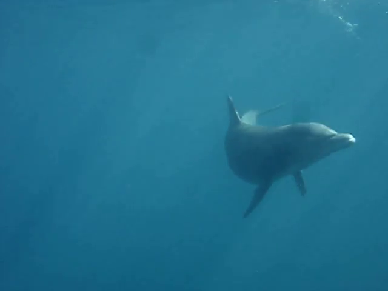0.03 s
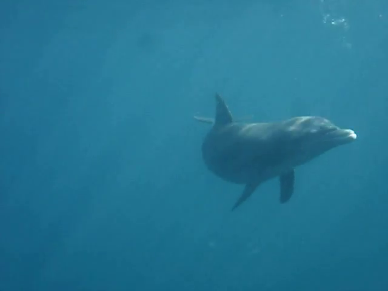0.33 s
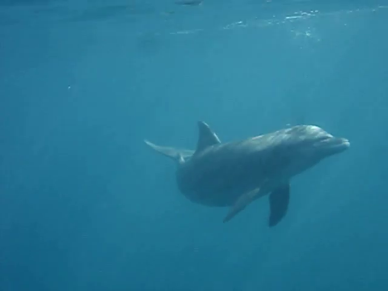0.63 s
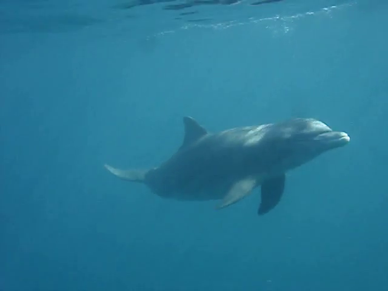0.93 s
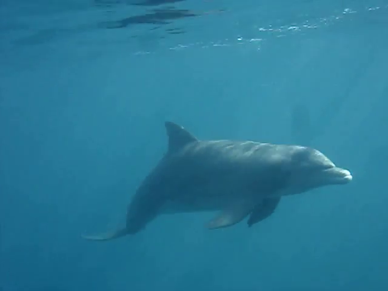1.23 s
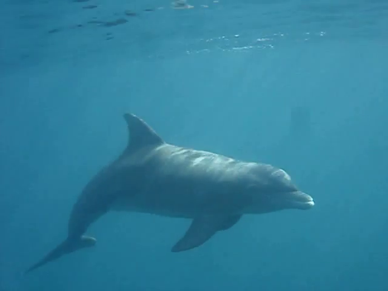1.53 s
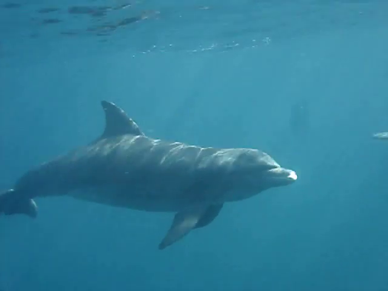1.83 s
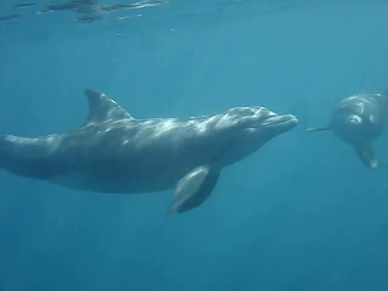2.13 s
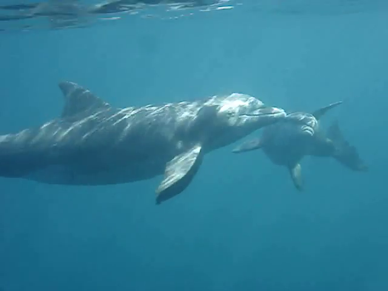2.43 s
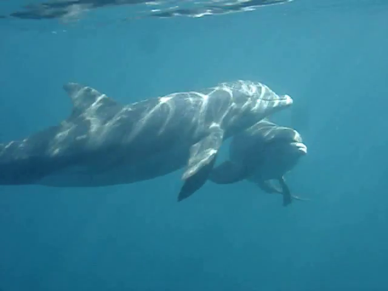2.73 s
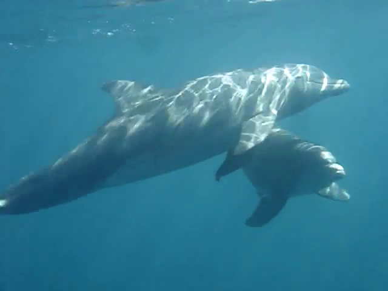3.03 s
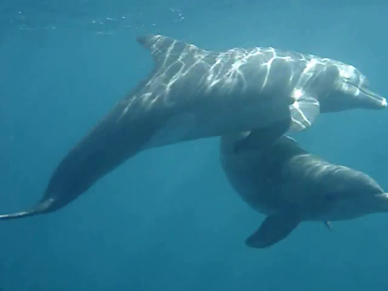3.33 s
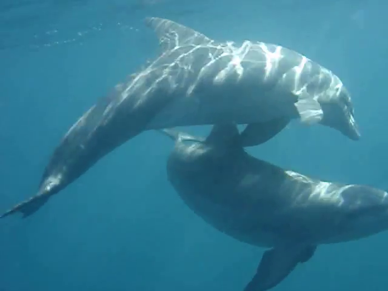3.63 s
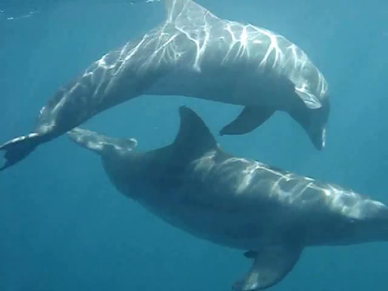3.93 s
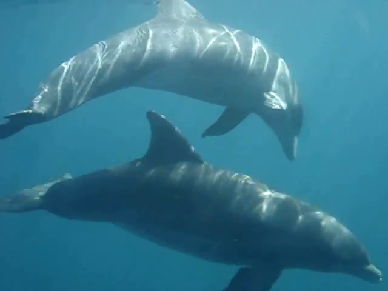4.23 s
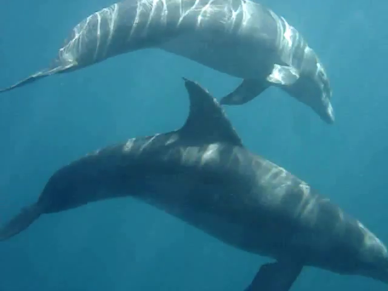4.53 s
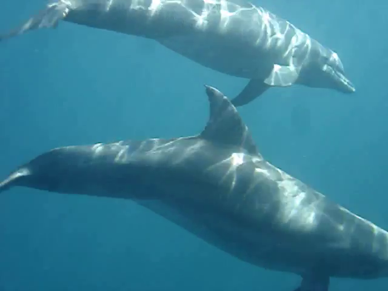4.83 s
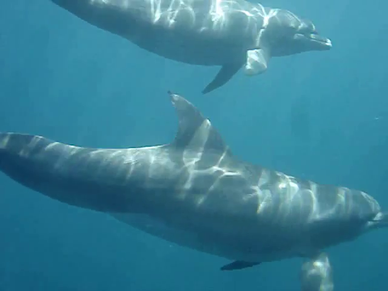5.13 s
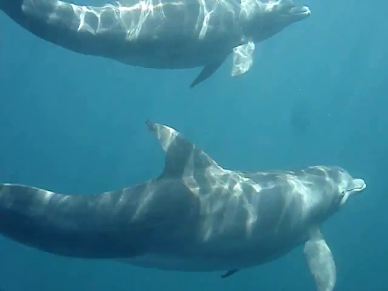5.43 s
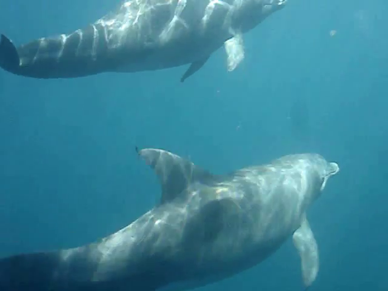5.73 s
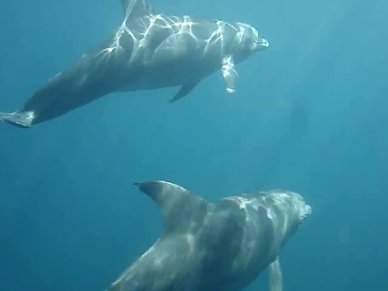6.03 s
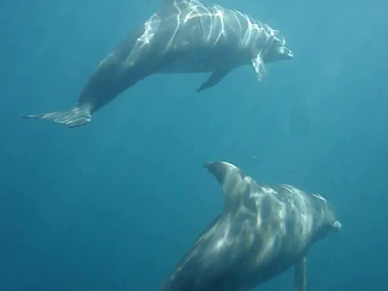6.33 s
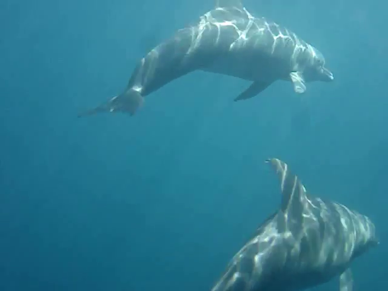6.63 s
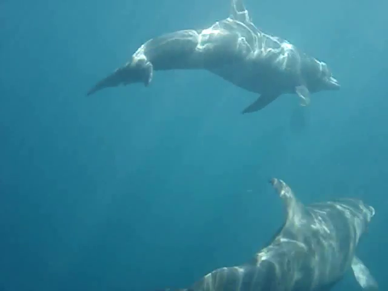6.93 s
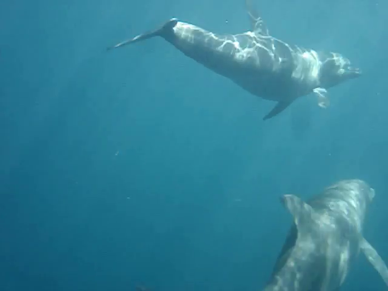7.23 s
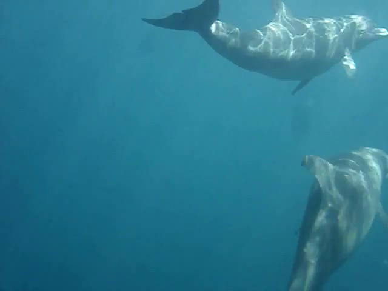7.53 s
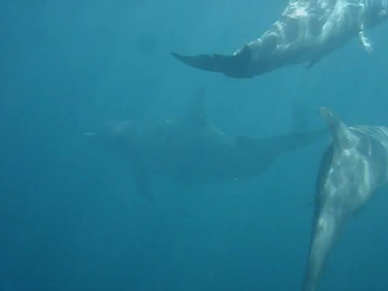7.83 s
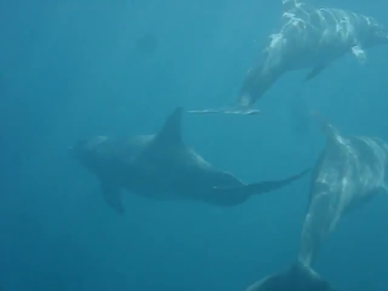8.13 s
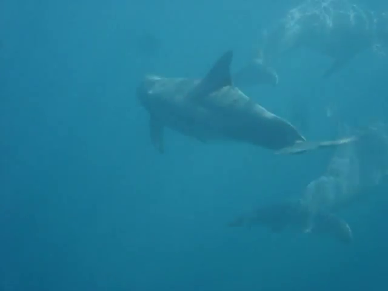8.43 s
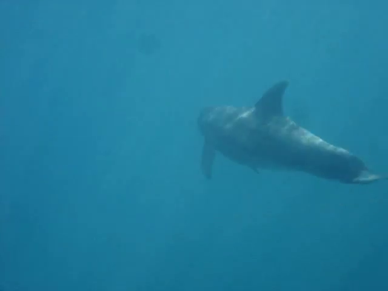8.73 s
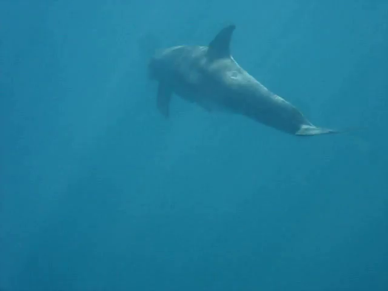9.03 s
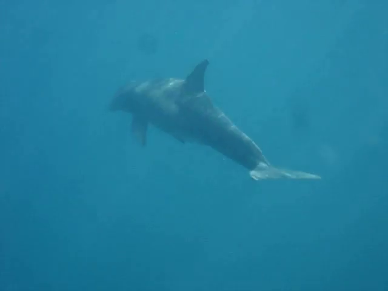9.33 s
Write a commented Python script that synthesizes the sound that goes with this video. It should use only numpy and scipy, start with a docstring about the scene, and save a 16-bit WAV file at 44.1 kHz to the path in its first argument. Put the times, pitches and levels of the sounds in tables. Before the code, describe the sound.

Just under the sea surface, water gulps softly against a camera's waterproof housing while the camera adds hiss, a thin whine and fast lens motor ticking. About halfway, dolphins give a few high whistles that dip and sweep upward. A strong surge then churns past with hollow thumps. Small clicks and bubble plinks are scattered throughout, and near the end the housing is knocked and rubbed.

```python
"""Dolphins near an underwater camera

Dolphins whistle near a small camera just under the sea surface, the pitch dipping and sweeping up.
Water gulps against the waterproof housing, which booms near 300 Hz; bubbles plink and one strong
surge churns past. At the end the housing is knocked and rubbed. The camera adds hiss, a thin whine
and the fast ticking of its lens motor."""
import sys
import numpy as np
from scipy import signal
from scipy.fft import next_fast_len
from scipy.io import wavfile
from scipy.ndimage import uniform_filter1d

SR = 44100
rng = np.random.default_rng(int(sys.argv[2]) if len(sys.argv) > 2 else 0)


def master_out(mix):
    """Clip the mix to full scale and print it as 16-bit PCM to the path in sys.argv[1]."""
    frames = np.transpose(np.atleast_2d(mix))
    ceiling = np.clip(frames, -1, 1)
    pcm = np.round(ceiling * 32767).astype(np.int16)
    wavfile.write(sys.argv[1], SR, pcm)


N = 422037
T = np.arange(N) / SR

# spectrum of small drops: f/Hz, level/dB
SPRAY_SPECTRUM = [(400, -9), (700, -3), (870, 13), (1250, -3), (1500, -9), (2300, -19.5), (4000, -39),
                  (9000, -38)]


def amp(db):
    return 10 ** (np.asarray(db) / 20)


def unit_rms(x):
    return x / np.sqrt(np.mean(x ** 2) + 1e-20)


def steadied(x, span_s):
    """Unit RMS over a sliding span."""
    return x / np.sqrt(abs(uniform_filter1d(x ** 2, max(int(span_s * SR), 2))) + 1e-9)


def curve(x, points):
    return np.interp(x, *np.transpose(points))


def add(mix, start_s, sound):
    part = mix[max(round(start_s * SR), 0):][:len(sound)]
    part += sound[:len(part)]


def coloured(x, spectrum):
    """Minimum-phase filter of unit energy; spectrum rows: f/Hz, level/dB."""
    hz, db = np.transpose(spectrum)
    bins_hz = abs(np.fft.fftfreq(8192, 1 / SR))
    log_gain = np.log(amp(np.interp(np.log(bins_hz + 1), np.log(hz), db)))
    response = np.exp(np.conj(signal.hilbert(log_gain)))
    taps = np.fft.ifft(response).real[:len(bins_hz) // 2]
    return signal.oaconvolve(x, taps / np.linalg.norm(taps))[:len(x)]


def resonate(x, hz, width_hz):
    """One resonance, peak gain about 1."""
    radius = np.exp(-np.pi * width_hz / SR)
    return 2 * signal.lfilter([1 - radius], [1, -radius * np.exp(2j * np.pi * hz / SR)], x).real


def drift(per_s):
    """Random wander of about unit size."""
    points = rng.standard_normal(N // 64)
    return np.interp(T * per_s, np.arange(len(points)), points)


def grains(per_s, spread_db):
    """Random tiny impacts, a few large; unit RMS."""
    size = amp(spread_db * np.minimum(rng.exponential(1, N), 4))
    return unit_rms(size * rng.choice([-1, 1], N) * (rng.random(N) < per_s / SR))


def swells(rows, attack_s, decay_s):
    """Gain of events that rise, hold and decay; powers add."""
    power = np.zeros(N)
    for start_s, length_s, db in rows:
        t = T[:int((length_s + 8 * decay_s) * SR)]
        gain = amp(db) * np.minimum(t / attack_s, 1) * np.exp(-np.maximum(t - length_s, 0) / decay_s)
        add(power, start_s, gain ** 2)
    return np.sqrt(power)


def background():
    """Even hiss, deep water rumble and the wavering whine of the electronics."""
    # hiss and whine contours: t/s, level/dB
    hiss_levels = [(0, -54), (3, -52.8), (4, -53.5), (7.3, -53), (8.3, -56.5), (9.57, -54)]
    whine_levels = [(0, -60), (6, -62.5), (7.8, -61.5), (8.4, -73), (9.57, -91)]
    # f/Hz, level/dB
    hiss_spectrum = [(20, 4), (100, 5), (300, 9), (600, 8), (1100, 5), (2000, 1.5), (3200, -0.5),
                     (4200, -0.5), (5200, -2), (6200, -4), (8300, -1), (9900, -10.5), (10200, -16),
                     (16000, -18)]
    whine_hz = 7868
    hiss = unit_rms(coloured(rng.standard_normal(N), hiss_spectrum))
    hiss *= amp(curve(T, hiss_levels) + 2.5 + .5 * drift(per_s=25))
    rumble = unit_rms(resonate(grains(per_s=60, spread_db=1.5), hz=76, width_hz=110))
    whine = np.sqrt(2) * np.sin(2 * np.pi * whine_hz * T + .17 * drift(per_s=34))
    whine *= amp(curve(T, whine_levels) + 2 * drift(per_s=30))
    return hiss + amp(-63) * rumble + whine


def stirring():
    """Strength of water motion at the housing: wavelets over a calm floor."""
    # t/s, length/s, level/dB
    wavelets = [(.18, 0.32, -56), (1.24, 0.11, -59), (1.8, .28, -56.5), (2.25, 0.53, -53.5),
                (4.05, 0.11, -50), (4.48, 0.04, -50), (5.15, 0.14, -62), (5.49, 0.2, -52.5),
                (5.97, .09, -50), (6.75, 1.0, -49), (7.98, 0.43, -53), (8.72, 0.064, -48.5),
                (8.86, 0.115, -49)]
    return np.hypot(amp(-56.5), swells(wavelets, attack_s=.024, decay_s=.03))


def slosh():
    """Small eddies tap the housing, which rings at its boom."""
    # f/Hz, level/dB
    eddy_spectrum = [(20, -12), (70, -9), (160, -6), (230, 0.5), (300, 5), (370, 2), (450, -6.5),
                     (750, -22.5), (1050, -9), (1400, -17), (3000, -26.5), (8000, -56)]
    eddies = coloured(grains(per_s=700, spread_db=5.5), eddy_spectrum)
    boom = amp(-9) * resonate(eddies, hz=296, width_hz=27)
    return amp(1.5) * steadied(eddies + boom, span_s=.69) * stirring()


def lens_motor():
    """Each step is a tiny rattle; the ticking swells in runs as the motor hunts for focus."""
    # t/s, length/s, level/dB
    focus_runs = [(.2, 0.19, -41), (.68, 0.097, -39.5), (1.66, .1, -41), (2.78, 0.52, -38.5),
                  (2.96, .33, -39), (3.33, 0.21, -38.5), (3.6, .1, -41), (4.35, 0.074, -38.5),
                  (4.53, 0.19, -38.5), (4.88, .08, -40), (5.44, 0.055, -39), (5.7, .12, -39),
                  (6.84, 0.061, -40), (7.13, 0.11, -36.5), (7.42, .45, -42.5), (8.54, .13, -43)]
    # t/s, step rate/Hz
    step_rates = [(2.96, 60), (2.98, 90), (3.2, 90), (3.22, 60)]
    # f/Hz, level/dB
    rattle_spectrum = [(500, -27), (2000, 4), (3000, 5.5), (4000, 11), (5200, 8), (6200, 5.5), (8500, 1.5),
                       (10000, 4.5), (10500, -39), (16000, -35)]
    decay_s, scatter_db = .0026, 1.1
    rate_hz = curve(T, step_rates)
    step, fraction = np.divmod(np.cumsum(rate_hz) / SR + .7, 1)
    strength = amp(scatter_db * rng.standard_normal(N))[step.astype(int)]
    rattle = strength * np.tanh(2 * rng.standard_normal(N)) * np.exp(-fraction / rate_hz / decay_s)
    idle, runs = amp(-42), swells(focus_runs, attack_s=.013, decay_s=.021)
    return amp(-5) * np.hypot(idle, runs) * coloured(rattle, rattle_spectrum)


def small_gulps(count):
    """Gulp rows at random times, stronger where the water is stirred."""
    at, scatter = rng.integers(0, N, count), rng.standard_normal((count, 3))
    db = 20 * np.log10(stirring()[at]) + 3 + 2.5 * scatter[:, 0]
    hz = 303.8 + 12.6 * scatter[:, 1]
    half_s = .016 * np.exp(.44 * scatter[:, 2])
    return list(zip(T[at], db, hz, half_s))


def gulps():
    """Air pockets at the housing swell and fade in a few cycles, each with a faint splash."""
    # t/s, level/dB, f/Hz, half length/s
    loud_gulps = [(0.215, -42.5, 321, 0.025), (2.266, -39, 311, .009), (2.301, -39, 298, .015),
                  (2.374, -41, 308, .012), (2.536, -34.5, 297, 0.015), (2.769, -37, 289, 0.0051),
                  (2.867, -39.5, 297, 0.0069), (3, -34, 299.6, 0.0041), (3.02, -37, 321, .008),
                  (3.113, -38.5, 290, 0.017), (3.268, -35.5, 284, 0.006), (3.292, -34.5, 314, .007),
                  (4.065, -39.5, 311, .009), (4.495, -38.5, 303, 0.0078), (5.202, -35.5, 296, 0.017),
                  (5.299, -46, 310.6, 0.048), (6.937, -34, 301, 0.0061), (7.752, -32.5, 306, 0.0082),
                  (7.999, -34, 303.4, 0.0035)]
    rows = loud_gulps + small_gulps(count=60)
    booms, wetness, t = np.zeros(N), np.zeros(N), T[:SR // 5]
    middle_s = t.mean()
    for (at_s, db, hz, half_s), phase_turns in zip(rows, rng.random(len(rows))):
        swell = amp(db) * np.exp(-((t - middle_s) / half_s) ** 2)
        add(booms, at_s - middle_s, swell * np.sin(2 * np.pi * (hz * t + phase_turns)))
        add(wetness, at_s - middle_s, swell)
    drops = coloured(grains(per_s=1500, spread_db=3.4), SPRAY_SPECTRUM)
    return booms + amp(-17.5) * uniform_filter1d(wetness, size=1500) * drops


def clicks():
    """Short snaps in the water and on the housing, whose shell adds a hollow ring."""
    # t/s, level/dB, f/Hz, decay/s
    snaps = [(.751, -26, 3600, .0008), (1.7333, -21.5, 3260, 0.0018), (2.185, -31, 4000, .002),
             (5.161, -22, 4280, .0015), (6.089, -31, 1300, 0.0041), (6.117, -22, 1010, 0.025),
             (6.219, -27, 700, .0049), (6.239, -24.5, 2000, 0.0014), (6.258, -27, 895, 0.0045),
             (6.901, -20, 2610, 0.0033), (8.223, -32.5, 2600, 0.0013), (8.9954, -35, 9200, .0015),
             (9.033, -26, 2500, 0.0022), (9.19, -31.5, 1100, 0.0023), (9.113, -31, 2430, .0031),
             (9.344, -28, 1680, 0.0047), (9.374, -24, 1900, .0025), (9.468, -26, 2160, 0.0014),
             (9.492, -26, 3420, .0018), (9.533, -34, 2200, .0027)]
    # f/Hz, width/Hz, level/dB
    shell_modes = [(1380, 390, -3.5), (1960, 79, -24), (2440, 76, 0), (3610, 210, -0.5)]
    direct, t = np.zeros(N), T[:SR // 25]
    for at_s, db, hz, decay_s in snaps:
        burst = rng.standard_normal(len(t)) * np.exp(-t / decay_s)
        snap = resonate(resonate(burst, hz, .83 * hz), hz, .83 * hz)
        add(direct, at_s, amp(db) * snap / abs(snap).max())
    ring = sum(amp(db) * resonate(direct, hz, width_hz) for hz, width_hz, db in shell_modes)
    return amp(-6) * direct + amp(-1) * ring


def bubbles():
    """Each bubble rings briefly, its pitch rising a little."""
    # t/s, level/dB, f/Hz, decay/s
    plinks = [(.782, -34, 550, .0055), (2.715, -40.5, 1060, .013), (3.57, -35.5, 1474, .011),
              (4.97, -40.5, 1670, 0.0088), (6.887, -30, 1340, 0.0068), (8.149, -32, 980, 0.016),
              (8.155, -30.5, 1230, .0058), (8.164, -32.5, 3110, .0025), (8.918, -32, 4940, .0013),
              (9.375, -25.5, 1690, 0.0042)]
    attack_s = .00012
    out, t = np.zeros(N), T[:SR // 8]
    for at_s, db, hz, decay_s in plinks:
        ring = np.sin(2 * np.pi * hz * t * (1 + .49 * t))
        add(out, at_s, amp(db) * ring * np.exp(-t / decay_s) * (1 - np.exp(-t / attack_s)))
    return out


def bumps():
    """Soft pushes set the housing booming."""
    # t/s, level/dB, f/Hz
    pulses = [(.784, -36, 305), (1.645, -38, 130), (1.673, -34, 190), (1.766, -37, 240), (4.76, -31, 225),
              (5.467, -34.5, 162), (6.117, -13.5, 260), (6.263, -13, 236), (6.394, -12.5, 265),
              (6.65, -19.5, 218), (6.70, -28.5, 220), (6.904, -23, 302), (7.131, -20.5, 250),
              (8.35, -23, 155), (8.9904, -15.5, 130), (8.998, -14.5, 55.3), (9.001, -15, 203),
              (9.089, -20, 80), (9.193, -8.5, 165), (9.276, -11.5, 284), (9.471, -17.5, 258)]
    pushes, t = np.zeros(N), T[:SR // 10]
    middle_s = t.mean()
    for at_s, db, hz in pulses:
        spread = (np.pi * hz * (t - middle_s)) ** 2
        add(pushes, at_s - middle_s, amp(db) * (2 * spread - 1) * np.exp(-spread))  # Ricker pulse
    return amp(-2) * pushes + amp(2) * resonate(pushes, hz=290, width_hz=48)


def splashes():
    """Ripples break overhead in showers of small drops."""
    # t/s, length/s, level/dB
    showers = [(2.38, 0.057, -57), (2.7, .08, -58), (4.11, 0.062, -54.5), (4.46, 0.074, -52.5),
               (7.18, 0.73, -58)]
    drops = steadied(coloured(grains(per_s=500, spread_db=1.6), SPRAY_SPECTRUM), span_s=.059)
    return swells(showers, attack_s=.03, decay_s=.018) * drops


def whistle(turn_s, low_hz, fall_s, rise_s, bow, db):
    """A near-pure tone dives and climbs, flaring where the housing lets it through."""
    # transmission into the housing: f/Hz, level/dB
    transmission = [(3900, -54), (4300, -32), (4650, -48), (5400, -51), (6270, -39), (6900, -49),
                    (7700, -53), (9000, -55), (10000, -59)]
    top_hz, fade_s, flutter_db = 10000, .012, 4.2
    t = T - turn_s
    fall = np.clip(-t / max(fall_s, 1 / SR), 0, 1)
    rise = np.clip(t / max(rise_s, 1 / SR), 0, 1)
    shoulder = .044 * np.cos(4 * np.pi * rise) * np.sin(np.pi * rise)  # the climb lingers midway
    height = fall ** 1.7 + rise ** bow - shoulder
    pitch_hz = uniform_filter1d(low_hz + (top_hz - low_hz) * height, size=300)
    gate = np.clip(np.minimum(t + fall_s, rise_s - t) / fade_s + .5, 0, 1)
    gain = gate * amp(db + curve(pitch_hz, transmission) + flutter_db * drift(per_s=170))
    phase = 2 * np.pi * np.cumsum(pitch_hz * (1 + .013 * drift(per_s=600))) / SR
    return gain * np.sqrt(2) * (np.sin(phase) + amp(-25) * np.sin(2 * phase))


def dolphins():
    """Echoes off the rippled surface beat against the direct path of each whistle."""
    # turning point t/s, lowest f/Hz, fall/s, rise/s, bow of the rise (1 = straight), level/dB
    calls = [(4.472, 4650, 0, .17, .8, -10), (4.825, 4650, .053, .195, .82, 2),
             (5.21, 4680, .061, .215, .8, -.5), (5.612, 3850, .06, .25, .62, -.5),
             (6.052, 4650, .08, 0, 1, -1)]
    echoes_per_s, echo_decay_s = 1500, .005
    direct = sum(whistle(*call) for call in calls)
    t = T[:SR // 10]
    paths = rng.choice([-1, 1], len(t)) * (rng.random(len(t)) < echoes_per_s / SR)
    paths = paths * np.exp(-t / echo_decay_s)
    echoes = signal.oaconvolve(direct, paths / np.linalg.norm(paths))[:N]
    return amp(-5.5) * (direct + amp(-3) * echoes)


def surge():
    """Collapsing air pockets pound; the surge sprays and the housing rattles with a thin high ring."""
    # t/s, length/s, level/dB
    gushes = [(6.081, .012, -23.5), (6.112, 0.026, -21.5), (6.218, 0.018, -25), (6.294, 0.09, -22),
              (6.49, 0.016, -31.5), (6.57, 0.07, -41.5), (7.15, 0.4, -46)]
    # f/Hz, level/dB
    pounding_spectrum = [(25, -29), (50, -38), (120, -6), (180, -17.5), (255, 2), (380, -4), (460, -20),
                         (550, -13.5), (730, -24.5), (1200, -30), (2000, -69), (5000, -50), (10000, -68)]
    # f/Hz, width/Hz, level/dB
    case_ring_bands = [(11800, 260, -37), (12450, 400, -36), (12200, 2400, -40)]
    strength = swells(gushes, attack_s=.0083, decay_s=.071)
    pounding = steadied(coloured(grains(per_s=1200, spread_db=3.9), pounding_spectrum), span_s=.038)
    spray = steadied(coloured(grains(per_s=900, spread_db=1.4), SPRAY_SPECTRUM), span_s=.06)
    spray *= (strength / strength.max()) ** .48
    case_ring = np.zeros(N)
    for hz, width_hz, db in case_ring_bands:
        band = resonate(grains(per_s=6000, spread_db=2.5), hz, width_hz)
        case_ring += amp(db) * unit_rms(resonate(band, hz, width_hz))
    return strength * (amp(2) * pounding + amp(-17) * spray + amp(-1.5) * case_ring)


def knocks():
    """Hard knocks rattle the housing."""
    # t/s, level/dB, hold/s, decay/s
    hits = [(8.992, -1.5, 0.0069, 0.0027), (9.2707, -13, 0.002, 0.0057), (9.56, -35, 0.0054, .008)]
    # f/Hz, level/dB
    knock_spectrum = [(40, -7), (170, 2), (520, 15.5), (720, -8), (1000, 0), (1520, 9), (1730, 0),
                      (2030, 7), (2600, -0.5), (3000, 3), (3600, 0), (5800, -16.5), (10000, -21.5),
                      (16000, -28)]
    rattle, t = np.zeros(N), T[:SR // 10]
    for at_s, db, hold_s, decay_s in hits:
        envelope = amp(db) * np.exp(-np.maximum(t - hold_s, 0) / decay_s)
        add(rattle, at_s, envelope * rng.standard_normal(len(t)))
    return amp(-10) * coloured(rattle, knock_spectrum)


def rubbing():
    """A hand strokes the housing: low boom, gripping scratch."""
    # t/s, length/s, level/dB, scratch over boom/dB
    strokes = [(8.996, 0.019, -28.5, -12), (9.071, 0.01, -29, -14), (9.231, 0.029, -30, -4.5),
               (9.343, 0.084, -34.5, -7.5), (9.484, 0.061, -33.5, -14.5), (9.543, .03, -18, -13)]
    # f/Hz, level/dB
    boom_spectrum = [(20, -2), (70, -12), (170, -8), (290, 4), (400, -4), (520, -13), (1000, -17),
                     (3000, -64.5)]
    scratch_spectrum = [(200, -8.5), (600, -5.5), (1100, 2), (1600, 4), (2300, -5.5), (3000, -6),
                        (3600, -11.5), (5000, -15), (9000, -23.5), (16000, -22)]
    attack_s, decay_s = .011, .034
    start_s, length_s, db, grip_db = np.transpose(strokes)
    boom = steadied(coloured(grains(per_s=1000, spread_db=3.1), boom_spectrum), span_s=.0304)
    boom *= swells(zip(start_s, length_s, db), attack_s, decay_s)
    scratch = coloured(grains(per_s=5000, spread_db=4.6), scratch_spectrum)
    scratch *= swells(zip(start_s, length_s, db + grip_db), attack_s, decay_s)
    return boom + scratch


def scene():
    water = bubbles() + gulps() + slosh() + splashes() + surge()
    calls = dolphins()
    housing = clicks() + bumps() + knocks() + rubbing()
    camera = lens_motor() + background()
    return (water + calls + housing + camera)[None]


def record(dry):
    """The camera's slow converter mirrors the treble weakly about half its rate; a low-pass follows."""
    converter_hz, cutoff_hz = 19903, 15900
    analytic = signal.hilbert(dry, next_fast_len(N))[:, :N]
    mirror = (np.conj(analytic) * np.exp(2j * np.pi * converter_hz * T)).real
    low_pass = signal.firwin(401, cutoff_hz, window=("kaiser", 7), fs=SR)
    return signal.oaconvolve(dry + amp(-17.5) * mirror, low_pass[None], "same")


dry = scene()
out = record(dry)
master_out(out)
```